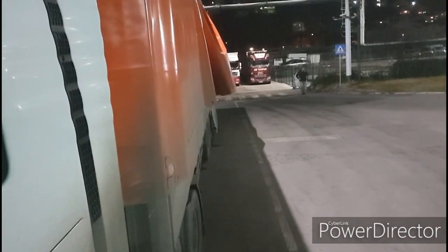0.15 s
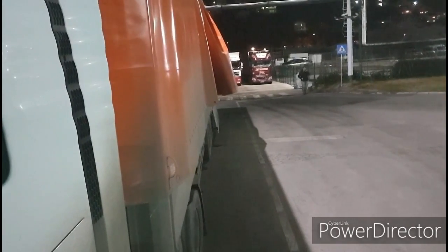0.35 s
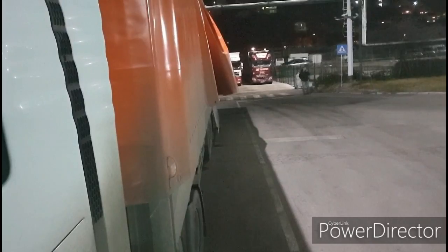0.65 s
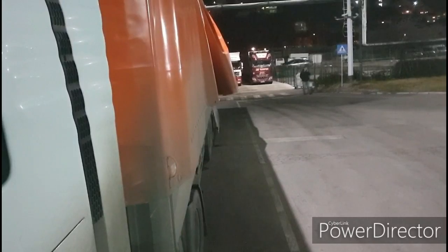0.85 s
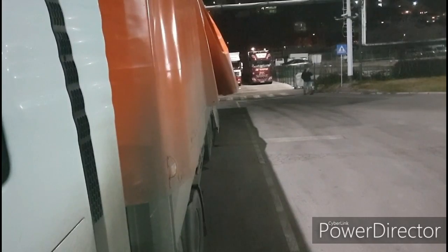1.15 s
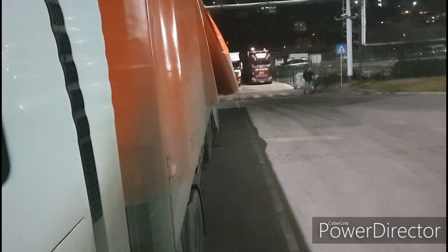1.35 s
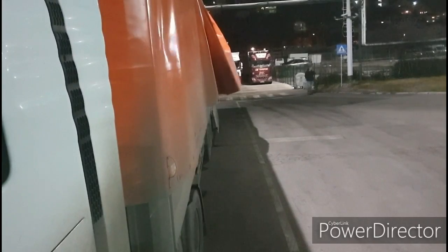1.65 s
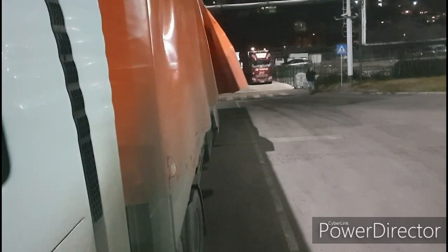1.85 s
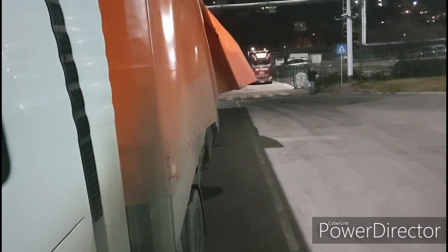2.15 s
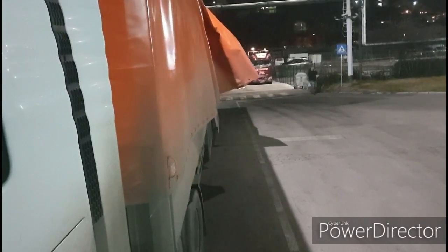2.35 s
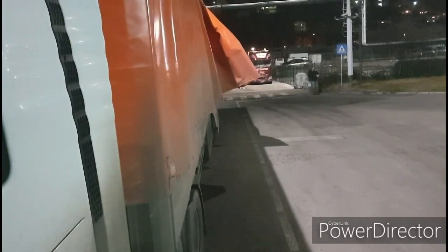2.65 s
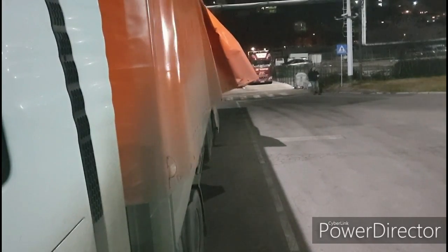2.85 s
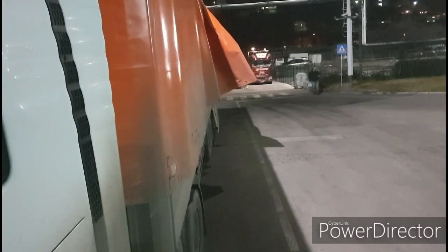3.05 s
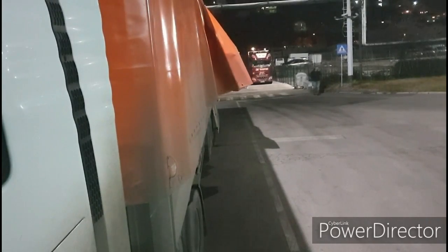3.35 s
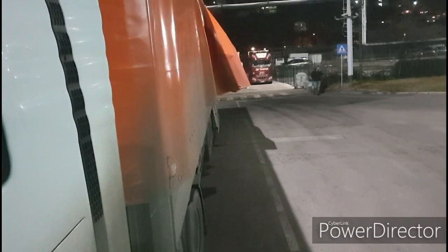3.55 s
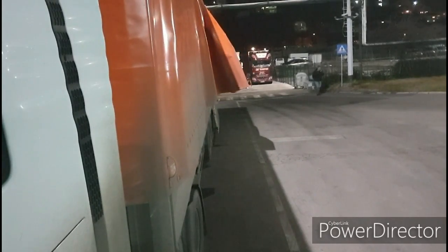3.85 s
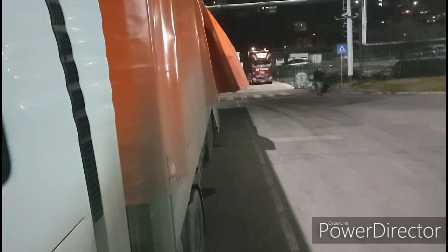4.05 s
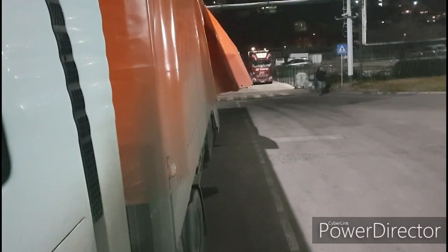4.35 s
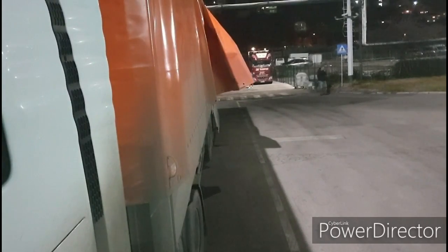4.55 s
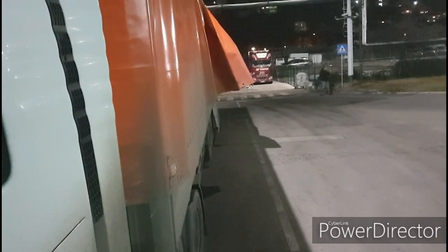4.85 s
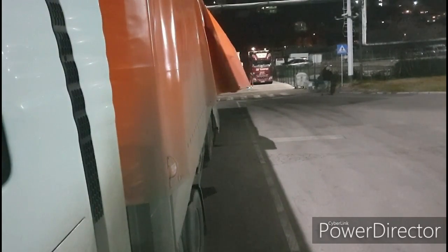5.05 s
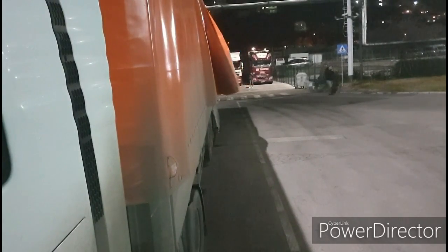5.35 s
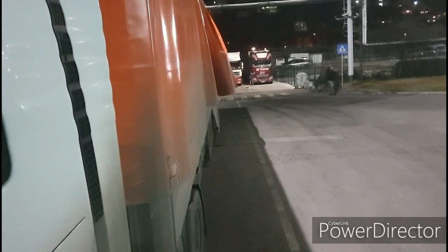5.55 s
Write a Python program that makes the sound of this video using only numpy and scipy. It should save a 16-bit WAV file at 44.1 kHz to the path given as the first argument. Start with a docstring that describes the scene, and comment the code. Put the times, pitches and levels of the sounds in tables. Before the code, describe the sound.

A night lorry park, heard by an exposed stereo microphone beside a trailer. Throughout, two idling diesels make a low tonal hum around 95 to 100 Hz, throbbing almost four times a second and slowly getting louder, with a thin fan and wavering cooler drone near 270 Hz and dull, swelling yard noise. The hum dips around 0.5 to 0.8 s as low wind puffs buffet the microphone from 0.5 to 0.95 s, mostly at the right, with faint cloth thumps among them. A light slap falls at 1.25 s. From 2.18 to 2.45 s, a tight run of five heavy, dull curtain thumps hits the trailer with a crisp rustle. Yard noise surges gently afterwards. A barely audible tick comes at 3.6 s; near 4.1 to 4.3 s there are soft taps, a clear buckle click and rustling, then a faint slap at 4.47 s. At 5.6 s a rough, snapping crack with low buffets ends abruptly.

```python
"""A low throb of idling diesels opens the night in a lorry park, heard at two ports by a trailer curtain.
Shaft orders make the hum: the strongest of two engines lie under 4 Hz apart and beat; cooler and fan drone.
Coloured noise makes the yard, the wind on the ports and the rustling cloth; short sine puffs make buffets.
Noise pushes ring decaying modes for thumps on the trailer and buckle clicks.
A last crack is flickering noise with snaps."""
import sys
import numpy as np
from scipy import signal
from scipy.fft import rfft, irfft, next_fast_len
from scipy.io import wavfile
from scipy.ndimage import uniform_filter1d

SR = 44100
rng = np.random.default_rng(int(sys.argv[2]) if len(sys.argv) > 2 else 0)


def nominal_scale(level):
    """Amplitude ratio for a level in decibels (scalar or array-like)."""
    x = np.asarray(level, float) / 20
    return 10 ** x


def waveform_to_disk(signal):
    """Save audio, clipped to [-1, 1], as 16-bit WAV at the path in sys.argv[1]."""
    frames = np.transpose(np.atleast_2d(signal))
    scaled = np.clip(frames, -1, 1) * 32767
    samples = np.round(scaled).astype(np.int16)
    wavfile.write(sys.argv[1], SR, samples)


N = 251539
T = np.arange(N) / SR

# Shaft speeds: (speed [turns/s], phase origin of the strongest order [s])
NEAR_SPEED = (24.711, .0048)
FAR_SPEED = (15.839, .0036)
FAN_SPEED = (260.05, 0)
COOLER_SPEED = (277.35, 0)
WHINE_SPEED = (853.3, 0)
# Shaft orders, strongest first: (order [cycles/turn], rms level before any later gain [dB])
NEAR_ORDERS = [(4, -31.5), (6, -40.5), (2, -56), (3, -46), (8, -56), (12, -56.5)]
FAR_ORDERS = [(6, -33.5), (3, -44), (8, -45), (4, -46), (12, -57), (7, -58), (9, -71.5), (13, -60.5),
              (21, -57)]
FAN_ORDERS = [(1, -49.5)]
COOLER_ORDERS = [(1, -48)]
WHINE_ORDERS = [(1, -65)]
# Brief dips of the diesels and fan, longest around the first buffets:
# (time [s], depth [dB], fall [s], hold [s], return [s])
HUM_DIPS = [(0.404, -19, 0.089, .22, .35), (2.24, -8, .015, .04, 0.043), (4.15, -12, .015, 0.014, .015)]
# Wavering of the cooler's tone: (time [s], gain [dB])
COOLER_WAVER = [(0, -1), (.8, -10.5), (1.8, 1.5), (2.4, 2.5), (3.1, -8.5), (3.8, 3.5), (4.1, -0.5),
                (4.35, 5.5), (4.65, -2), (5.1, 7), (5.6, 7)]
# Spectrum of the yard noise: (frequency [Hz], relative density [dB])
YARD_COLOUR = [(70, -15.5), (110, -12), (200, -17.5), (280, -15.5), (372, -20.5), (500, -22.5),
               (800, -31.5), (1100, -29.5), (1540, -39.5), (2000, -40.5), (2900, -48.5), (4070, -50),
               (5300, -55.5), (6720, -56.5), (7700, -62.5), (8880, -82.5), (13500, -80), (15500, -95.5)]
# Directions of the yard noise: (delay of the left port, rounded in use [samples], share [dB])
ARRIVALS = [(21, 0), (-3, -0.5), (-18.5, -4)]
# Rumble, drone and hiss of the yard: (lower edge [Hz], upper edge [Hz])
YARD_ZONES = [(155, 400), (450, 1500), (1800, 7000)]
# The same three zones: (level before swell and flicker [dB], gain per dB of swell [dB/dB])
YARD_PARTS = [(-44, 0.72), (-49, 1.25), (-56.5, 0.92)]
# Swelling and sinking of the yard noise: (time [s], level [dB])
YARD_SWELL = [(0, -1), (.2, -1.5), (.62, -4.5), (1.05, -3.5), (1.67, -1.5), (1.93, 1.5), (2.11, -0.5),
              (2.35, 5), (2.6, 1.5), (3.07, 2.5), (3.42, 5), (3.65, 1.5), (4.1, 2), (4.52, 4), (4.71, 2),
              (4.91, 6), (5.1, 2.5), (5.36, 0.2), (5.6, 1.4)]
# Spectra of low gusts, eddies and rustling cloth: (frequency [Hz], relative density [dB])
GUST_COLOUR = [(15, -16), (30, -7.5), (50, 21), (85, 0), (130, 11.5), (300, -50)]
EDDY_COLOUR = [(15, -29.5), (30, -2.5), (60, -2.5), (100, 4.5), (150, -9), (300, -14.5), (600, -24.5),
               (1500, -61)]
RUSTLE_COLOUR = [(3000, -29.5), (6000, -11), (9000, -4.5), (10500, -6), (13000, -4), (15000, -6),
                 (15500, -27.5)]
# Low pushes of air shared by both ports: (time of peak [s], level [dB], 10 dB rise [s], 10 dB fall [s])
PUSHES = [(0, -34.5, .05, 0.12), (.75, -47.5, .15, .08), (1.76, -43, 0.13, 0.55), (2.85, -43.5, .3, .15),
          (4.35, -41.5, .7, .15), (5.6, -31.5, .2, .2)]
# Eddy strength at the ports, before flutter: (time [s], level [dB])
EDDY_STRENGTH = [(0, -39.5), (.35, -41.5), (.75, -33), (.88, -32.5), (1.03, -47), (1.4, -50), (1.6, -39),
                 (2.2, -43), (3.2, -40), (3.6, -40), (5.7, -43.5)]
# Rustles of the cloth: (time of peak [s], level [dB], 10 dB rise [s], 10 dB fall [s])
RUSTLES = [(0, -75.5, .02, 0.091), (1.15, -74.5, .06, .04), (1.25, -76.5, 0.028, .15),
           (2.2, -59.5, .015, .06), (2.35, -69.5, .03, .05), (2.56, -73, 0.043, 0.19),
           (2.82, -71.5, .03, .15), (3.59, -69, .03, .08), (4.07, -75.5, .15, .07),
           (4.235, -66.5, 0.046, .03), (4.29, -64.5, .03, .07), (4.48, -76, .04, .15), (5.49, -79, .1, .2)]
# Single buffets, starting 8 ms before the time:
# (time [s], peak [dB], pitch [Hz], half-length [cycles], left minus right [dB])
BUFFETS = [(0.514, -23, 95, 1.4, -5), (0.588, -21.5, 95, 1.9, -26), (0.634, -26.5, 68.4, 1.4, -24),
           (0.694, -29, 61.9, 1.3, -28), (0.764, -21.5, 113.6, 2.3, -16), (0.783, -15.5, 95, 1.03, 3),
           (0.863, -16, 93.4, 2.15, 2), (0.945, -26, 113, 1.2, -3), (5.619, -19.5, 103, 1.3, 2),
           (5.648, -28, 105, 1.5, 7), (5.684, -23, 114, 1, 1)]
# Curtain landing on the trailer:
# (time [s], body peak [dB], push length [s], body centre [Hz], spray peak re body [dB])
THUMPS = [(0.644, -29, 0.092, 550, -19.5), (0.748, -28, 0.027, 450, -20), (1.249, -32, 0.033, 890, -13),
          (2.181, -13, 0.062, 228, -21), (2.254, -16.5, .025, 465, -28.5), (2.288, -20.5, 0.026, 268, -30),
          (2.322, -17.5, 0.06, 240, -24), (2.376, -20, .05, 260, -27.5), (2.419, -25, 0.07, 350, -22.5),
          (4.107, -30.5, 0.057, 547, -21), (4.179, -27.5, 0.027, 610, -15), (4.47, -32, 0.098, 500, -10.5)]
# Modes of the trailer side, before weighting by each thump: (frequency [Hz], level [dB], t60 [s])
TRAILER_MODES = [(199, 0, .18), (228, -5, .1), (253, -4, .12), (297, -2, .09), (335, -11, .07),
                 (470, -7, .05), (549, -7, .05), (680, -9, .04), (851, -5, .05), (1000, -7, .04),
                 (1150, -6, .04), (1954, -11, .03)]
# Buckle clicks: (time [s], peak [dB])
CLICKS = [(3.581, -46), (4.1805, -28.5)]
# Modes of the buckle: (frequency [Hz], relative level [dB], t60 [s])
BUCKLE_MODES = [(1700, -5, .01), (2580, -6, .02), (3130, 0, .018), (3610, -1, .016), (4200, -2, .014),
                (4620, -3, .014), (6500, -10, .006)]
# Spectrum of the crack: (frequency [Hz], relative density [dB])
CRACK_COLOUR = [(120, -36), (200, -3), (280, 0.5), (500, -6.5), (629, -12), (1270, -8.5), (1540, -13),
                (2160, -14), (2620, -21), (3130, -17.5), (6550, -28.5), (7290, -31), (10000, -32),
                (12800, -35), (13500, -58)]
# Body and treble of the crack, before onset and crackle:
# (time of peak [s], level [dB], 10 dB rise [s], 10 dB fall [s])
CRACK_BODY = [(5.638, -24.5, 0.024, 0.029), (5.687, -29.5, .015, .02)]
CRACK_TREBLE = [(5.625, -37, .03, .04), (5.653, -31, .03, 0.035)]
# Hard snaps in the crack: (time [s], peak [dB])
CRACK_SNAPS = [(5.618, -19), (5.626, -21), (5.637, -14), (5.656, -19), (5.684, -21)]
# Modes of the fittings rung by the snaps: (frequency [Hz], relative level [dB], t60 [s])
SNAP_MODES = [(1270, 1, 0.034), (1900, 0, .035), (2140, -3, .03), (3064, -4, .03), (3830, -9, .02),
              (4720, -9, .025), (5950, -13.5, .02)]


def unit(x):
    """Normalisation to an rms of 1."""
    return x / np.sqrt(np.mean(x ** 2))


def curve(table):
    """Linear interpolation of a (time, level) table at every sample."""
    return np.interp(T, *np.transpose(table))


def walk(rate):
    """Slow random modulation: levels held for 1 / rate s, smoothed twice, with an rms of 1."""
    hold = int(SR / rate)
    levels = np.repeat(rng.standard_normal(N // hold + 1), hold)
    smooth = uniform_filter1d(uniform_filter1d(levels, hold), hold)
    return unit(smooth[:N])


def swells(rows, floor_db):
    """Incoherent addition: powers of exponential rises and falls sum over a steady floor."""
    power = nominal_scale(2 * floor_db)
    for s, db, rise, fall in rows:
        tens_below_peak = np.where(T < s, (s - T) / rise, (T - s) / fall)
        power = power + nominal_scale(2 * db - 20 * tens_below_peak)
    return np.sqrt(power)


def noise(colour, lo_hz=1, hi_hz=SR, channels=1):
    """Spectral shaping of white noise by a colour table, between two soft third-order edges."""
    size = next_fast_len(N)
    f = np.maximum(np.arange(size // 2 + 1) * SR / size, 1)
    hz, db = np.transpose(colour)
    edges = np.sqrt((1 + (lo_hz / f) ** 6) * (1 + (f / hi_hz) ** 6))
    gain = nominal_scale(np.interp(np.log(f), np.log(hz), db)) / edges
    white = rng.standard_normal((channels, size))
    return irfft(rfft(white) * gain, size)[:, :N]


def band(x, lo_hz, hi_hz):
    """Band-pass filtering between two edges."""
    return signal.sosfilt(signal.butter(2, [lo_hz, hi_hz], "bandpass", fs=SR, output="sos"), x)


def ports(x, lag):
    """Arrival-time difference: the left port hears the wave lag samples late."""
    return np.array([np.roll(x, lag), x])


def ring(push, modes):
    """Modal response: the push is convolved with a sum of exponentially decaying sines."""
    t = T[:SR // 5]
    body = sum(nominal_scale(db) * np.sin(2 * np.pi * hz * t) * 1000 ** (-t / t60) for hz, db, t60 in modes)
    return signal.fftconvolve(push, body)


def add(out, s, x, db):
    """Superposition: x joins the mix at time s with its largest peak at db."""
    i = int(s * SR)
    n = min(x.shape[-1], N - i)
    out[:, i:i + n] += nominal_scale(db) * x[..., :n] / np.abs(x).max()


def shaft(speed, orders, waver_db, hunt_turns):
    """Harmonic orders of a rotating shaft whose phase hunts while each order's level wavers."""
    turns_per_s, origin_s = speed
    turns = turns_per_s * (T - origin_s) + hunt_turns * walk(1.487)
    out = 0
    for i, (order, db) in enumerate(orders):
        offset = rng.random() if i > 0 else 0
        level = np.sqrt(2) * nominal_scale(db + waver_db * walk(5))
        out = out + level * np.cos(2 * np.pi * (round(order) * turns + offset))
    return out


def diesels_and_fan():
    """Beating: close orders of two engines throb, with a fan tone, under one slowly rising gain."""
    near = shaft(NEAR_SPEED, NEAR_ORDERS, 0.41, 0.005)
    far = shaft(FAR_SPEED, FAR_ORDERS, 0.46, 0.0024)
    fan = ports(shaft(FAN_SPEED, FAN_ORDERS, 3.7, 0.067), 7)
    gain_db = -3 + 0.88 * T  # rises 0.88 dB per s
    for s, depth_db, *lengths in HUM_DIPS:
        corners = np.cumsum([0, *lengths])
        gain_db = gain_db + depth_db * np.interp(T - s, corners, [0, 1, 1, 0])
    return (near + far + fan) * nominal_scale(gain_db)


def cooler():
    """Amplitude modulation of the cooling unit's tone, stronger at the right port."""
    tone = shaft(COOLER_SPEED, COOLER_ORDERS, 2.8, .12)
    return ports(tone * nominal_scale(curve(COOLER_WAVER)), 8) * nominal_scale([[-1.1], [1.1]])


def whine():
    """A single sinusoid with wandering phase: a faint high tone reaching the left port late."""
    return ports(shaft(WHINE_SPEED, WHINE_ORDERS, 1.1, 0.43), 21)


def yard():
    """Superposed arrivals: noise from three directions flickers in overlapping half-octave-spaced bands."""
    x = sum(nominal_scale(share_db) * ports(noise(YARD_COLOUR)[0], round(lag)) for lag, share_db in ARRIVALS)
    # above about 500 Hz the ports hear less alike
    x = x + nominal_scale(-5.5) * noise(YARD_COLOUR, 500, channels=2)
    swell_db = curve(YARD_SWELL)
    gains = []
    for zone, (db, share) in zip(YARD_ZONES, YARD_PARTS):
        zone_rms = np.std(band(x.mean(axis=0), *zone))
        gains.append(nominal_scale(db + share * swell_db) / zone_rms)
    size = next_fast_len(N)
    spectrum = rfft(x, size)
    octave = np.log2(np.maximum(np.arange(size // 2 + 1) * SR / size, 1))
    zone_centres = np.log2(YARD_ZONES).mean(axis=1)
    out, together = 0, walk(16)
    for centre in np.arange(6, 14.5, .5):  # log2 of Hz
        window = np.clip(1 - 2 * np.abs(octave - centre), 0, 1)
        # geometric blend of the two nearest zone gains
        place = np.interp(centre, zone_centres, np.arange(3))
        blend = place % 1
        gain = gains[int(place)] ** (1 - blend) * gains[int(np.ceil(place))] ** blend
        flicker = nominal_scale(0.73 * together + 1.92 * walk(30))
        out = out + irfft(spectrum * window, size)[:, :N] * gain * flicker
    return out


def wind():
    """Turbulent pressure: low gusts common to both ports, with eddies independent at each."""
    gusts = unit(noise(GUST_COLOUR)) * swells(PUSHES, -56) * nominal_scale(3 * walk(12))
    flutter = np.array([walk(15), walk(14)])
    eddies = unit(noise(EDDY_COLOUR, channels=2)) * nominal_scale(curve(EDDY_STRENGTH) + 1.8 * flutter)
    return gusts + eddies


def rustle():
    """Friction noise of cloth: independent treble noise at each port swells over a faint stir."""
    return unit(noise(RUSTLE_COLOUR, channels=2)) * swells(RUSTLES, -85.5) * nominal_scale(1.5 * walk(52))


def buffets():
    """Short pressure pulses: windowed sines whose phase and level differ between the ports."""
    out = np.zeros((2, N))
    for s, db, hz, cycles, pan_db in BUFFETS:
        t = T[:int(2 * cycles / hz * SR)]
        phase = 0.26 * rng.random((2, 1))  # cycles
        puff = np.hanning(len(t)) * np.sin(2 * np.pi * (hz * t + phase))
        add(out, s - .008, puff * nominal_scale([[pan_db / 2], [-pan_db / 2]]), db)
    return out


def thumps():
    """Forced modal vibration: the landing curtain rings the trailer side and sprays cloth noise."""
    out = np.zeros((2, N))
    t = T[:SR // 5]
    for s, db, length, centre_hz, spray_db in THUMPS:
        # the cloth lands within 3 ms, presses on, then lifts off
        hold = 1 / (1 + (t / length) ** 8)
        press = np.minimum(t / .003, 1) * (hold + 0.2 * np.exp(-t / .008))
        push = rng.standard_normal((2, len(t))) * press
        # modes lose 5 dB per octave away from the body centre
        modes = [(hz, g_db - 5 * abs(np.log2(hz / centre_hz)), t60) for hz, g_db, t60 in TRAILER_MODES]
        body = band(ring(push[0], modes), 140, 2500)
        # heard along the trailer side and again, 5 ms later, off the ground
        ground = .3 * ports(np.roll(body, 220), -4)
        add(out, s, ports(body, 23) + ground, db)
        spray = band(push, 1500, 4600) + 0.1 * band(push, 7400, 18000)
        add(out, s, spray, db + spray_db)
    return out


def clicks():
    """Impulsive excitation: a brief noise jingle rings the modes of a buckle."""
    out = np.zeros((2, N))
    t = T[:SR // 10]
    jingle = np.minimum(t / 0.0012, 1) * (np.exp(-t / .01) + .25 * np.exp(-t / 0.026))
    for s, db in CLICKS:
        push = rng.standard_normal(len(t)) * jingle
        add(out, s, band(ring(push, BUCKLE_MODES), 1500, 5500), db)
    return out


def crack():
    """Random modulation of noise: the curtain tears at the air, its treble dying first; snaps ring fittings."""
    onset = np.clip((T - 5.608) / 0.014, 0, 1) ** 2  # start [s], attack [s]
    body_gain, treble_gain = swells(CRACK_BODY, -30.5), swells(CRACK_TREBLE, -43.5)
    out = 0
    for lo_hz, hi_hz, gain in [(245, 2700, body_gain), (2700, SR, treble_gain)]:
        shared = ports(noise(CRACK_COLOUR, lo_hz, hi_hz)[0], 22)
        tear = shared + 1.9 * noise(CRACK_COLOUR, lo_hz, hi_hz, channels=2)
        crackle = nominal_scale(2.5 + 2.63 * walk(300))
        out = out + unit(tear) * onset * gain * crackle
    t = T[:SR // 50]
    blow = np.minimum(t / 0.00033, 1) * np.exp(-t / 0.0018)
    for s, db in CRACK_SNAPS:
        pushes = rng.standard_normal((2, len(t))) * blow
        add(out, s, np.array([ring(push, SNAP_MODES) for push in pushes]), db)
    return out


def scene():
    """Linear superposition of all sources at the two ports."""
    hum = diesels_and_fan() + cooler() + whine()
    return hum + yard() + wind() + rustle() + buffets() + thumps() + clicks() + crack()


def band_limit(x):
    """A steep low-pass at the top of the band."""
    return signal.sosfilt(signal.butter(12, 15660, fs=SR, output="sos"), x)


def record(dry):
    """Transducer sensitivity: the left port is 1.2 dB less sensitive than the right."""
    mix = dry * nominal_scale([[-.6], [.6]])
    return band_limit(mix)


dry = scene()
out = record(dry)
waveform_to_disk(out)
```